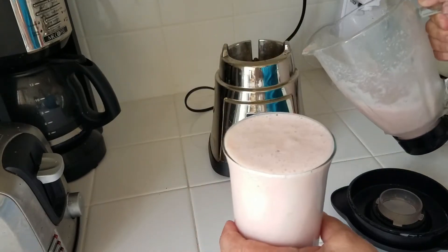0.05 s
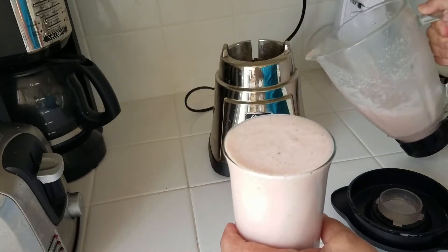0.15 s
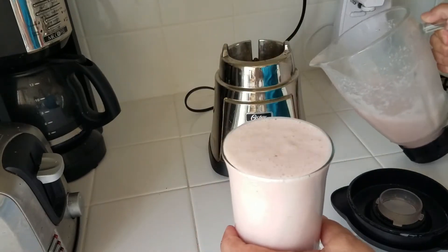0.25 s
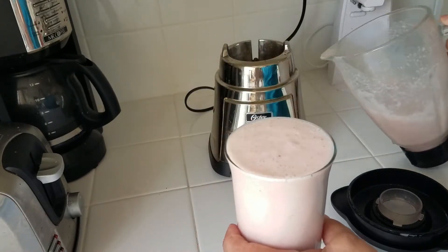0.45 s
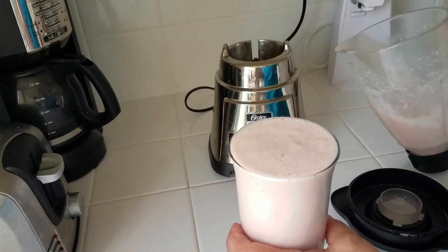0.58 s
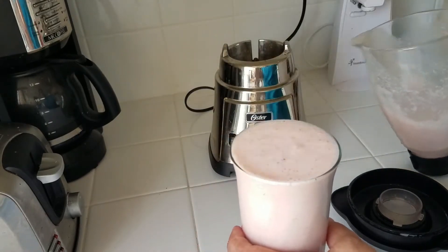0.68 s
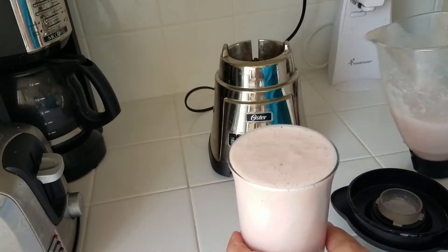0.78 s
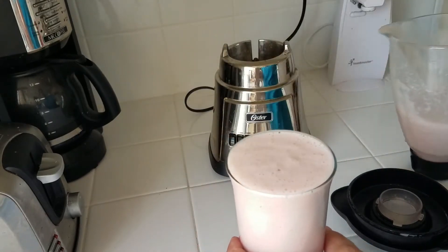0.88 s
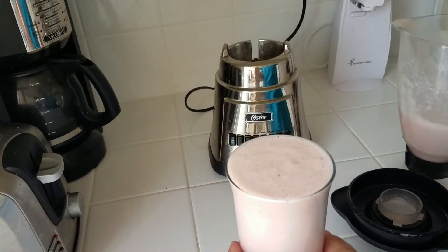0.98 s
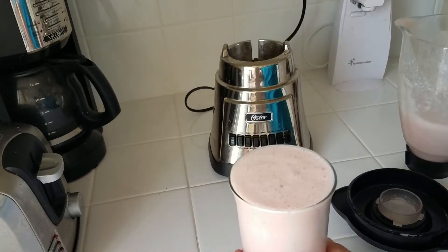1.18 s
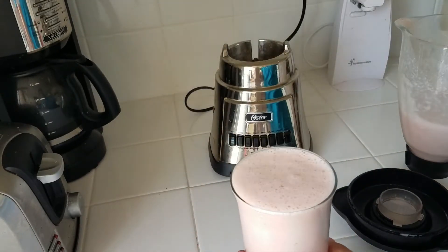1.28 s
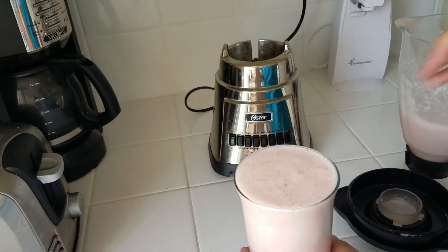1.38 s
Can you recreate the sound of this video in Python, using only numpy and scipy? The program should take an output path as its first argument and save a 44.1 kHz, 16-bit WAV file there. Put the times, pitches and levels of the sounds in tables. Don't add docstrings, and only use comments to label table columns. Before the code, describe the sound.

A heavy glass jar is set on a hollow tiled counter. After quiet room hum and faint hiss, it lands at 0.22 seconds with a deep thump, sharp clink, rattle and quick bounces until 0.29. A soft gritty scuff runs from 0.61 to 0.84. Its edge knocks at 0.97, it drops flat with a crack at 1.02, then rocks and settles by 1.1. Short kitchen reflections.

```python
import sys
import numpy as np
from scipy import signal
from scipy.io import wavfile
from scipy.ndimage import uniform_filter1d

SR = 44100
rng = np.random.default_rng(int(sys.argv[2]) if len(sys.argv) > 2 else 0)


def transcribe(signal):
    frames = np.atleast_2d(signal).T
    limited = np.clip(frames, -1, 1)
    pcm = np.round(limited * 32767).astype(np.int16)
    wavfile.write(sys.argv[1], SR, pcm)


def magnitude_from_level(level_db):
    exponent = np.asarray(level_db, float) / 20
    return 10 ** exponent


N = 63945


def at_hz(points, hz):
    table = np.array(points)
    return np.interp(np.log(hz), np.log(table[:, 0]), table[:, 1])


def rms_one(x):
    return x / np.sqrt(np.mean(x ** 2) + 1e-20)


def butter(x, order, hz, kind="low"):
    return signal.sosfilt(signal.butter(order, hz, kind, fs=SR, output="sos"), x)


def clicks(s, gain):
    out = np.zeros(N) + 1e-18
    out[np.clip((np.asarray(s) * SR).astype(int), 0, N - 1)] = gain
    return out


def ring(x, hz, t60):
    r = magnitude_from_level(-60 / (max(t60, 0.01) * SR))
    w = 2 * np.pi * hz / SR
    return signal.lfilter([0, np.sin(w)], [1, -2 * r * np.cos(w), r * r], x)


def burst_decay(s, db, t60):
    return signal.lfilter([1], [1, -magnitude_from_level(-60 / (t60 * SR))], clicks(s, magnitude_from_level(db)))


# frequency in Hz, likeness from 0 to 1.
LEFT_RIGHT_LIKENESS = [(100, 0.99), (300, 0.78), (600, 0.28), (2000, 0.01), (10000, 0.01)]


def coloured(spectrum, patchy_db):
    out = 0
    edges = 28 * 2 ** np.arange(0, 9.6, 0.5)
    white = rng.standard_normal((2, 2, N))
    for k, (low, high) in enumerate(zip(edges, edges[1:])):
        mid, side = butter(white[k % 2], 2, [low, high], "band")
        hz = np.sqrt(low * high)
        alike = np.clip(at_hz(LEFT_RIGHT_LIKENESS, hz), 0, 1)
        flicker = np.interp(np.arange(N), np.linspace(0, N, 20), rng.standard_normal(20))
        stereo = np.sqrt(1 + alike) * mid + np.sqrt(1 - alike) * side * [[1], [-1]]
        out = out + magnitude_from_level(at_hz(spectrum, hz) + patchy_db * flicker) * stereo
    return rms_one(out)


# frequency in Hz, level in dB per Hz.
HUM_COLOUR = [(30, -23), (50, 4.5), (110, 1.5), (400, -2), (700, -14.5), (3000, -25.5), (7500, -41),
              (13000, -35)]


def room_hum():
    return magnitude_from_level(-53.5) * coloured(HUM_COLOUR, patchy_db=1.5)


def thump(touches, modes, lead=-1):
    contact_hz, push_cut_hz, side_db = 336, 121.3, -18
    s, db = np.transpose(touches)[:2]
    r = np.exp(-2 * np.pi * contact_hz / SR)
    hits = clicks(s, magnitude_from_level(db) * np.where(s == s[0], lead, 1))
    push = signal.lfilter([(1 - r) ** 3], np.poly([r, r, r]), hits)
    push = butter(push, 2, push_cut_hz, "high")
    rings = np.array([magnitude_from_level(level_db) * ring(push, hz, t60) for hz, level_db, t60 in modes])
    slope = np.gradient(rings, axis=1) * SR / 1200
    side = magnitude_from_level(side_db) * rng.choice([-1, 1], len(modes)) @ slope
    return rings.sum(0) + side * [[1], [-1]]


def glass(touches, pitches, modes):
    port_turn = 0.33
    s, db = np.transpose(touches)[[0, 3]]
    out = np.zeros((2, N))
    for hz, (level_db, t60) in zip(pitches, modes):
        wave = ring(clicks(s, magnitude_from_level(db + level_db)), hz, t60)
        delay = SR * port_turn * rng.uniform(0.72, 0.77) / hz
        late = np.interp(np.arange(N) - delay, np.arange(N), wave)
        out += [wave, late] if rng.random() < 0.5 else [late, wave]
    return out


def crack(touches, colour):
    s, db = np.transpose(touches)[[0, 2]]
    return burst_decay(s, db, t60=0.07) * coloured(colour, patchy_db=1)


# start in seconds, thump in dB, crack in dB, glass in dB.
LANDING = [
    (.2195, -16.5, -39.5, -91),
    (.224, -6, -34.5, -81),
    (.2365, -13, -28.5, -39),
    (.2485, -14, -37, -52.5),
    (.265, -13, -37.5, -83),
    (.2825, -22.5, -53, -75),
    (.291, -27.5, -58, -80),
]
# frequency in Hz, level in dB, t60 in seconds.
LANDING_COUNTER = [(51.5, -4, 0.31), (109, -2, 0.14), (122, -2.5, 0.069), (169.4, 1.5, 0.071),
                   (199.9, -19.5, 0.55), (228, -3.5, 0.061), (277.6, -7, 0.3), (333, -16.5, 0.14),
                   (378.9, -15.5, 0.31), (466.6, -10, 0.14), (499.7, -35.5, 0.75)]
LANDING_GLASS_HZ = [1269, 1360, 1420, 1615, 2454, 3666, 3920, 3960, 4990, 5180, 6643, 7079, 8985, 9825]
# level in dB, t60 in seconds.
LANDING_GLASS = [(3, 0.21), (3, 0.11), (5, 0.05), (1, .2), (1.5, 0.38), (-3, 0.42), (-16, 0.32), (8, 0.14),
                 (-1.5, 0.17), (-1.5, 0.099), (-13, .15), (-11, 0.17), (-11.5, .11), (-9, 0.051)]
# frequency in Hz, level in dB per Hz.
LANDING_CRACK = [(250, -37), (500, 5.5), (1400, -1), (2200, -3.5), (5200, -20), (6200, -27), (9000, -29.5),
                 (16000, -50.5)]


def landing():
    thumps = thump(LANDING, LANDING_COUNTER)
    rings = glass(LANDING, LANDING_GLASS_HZ, LANDING_GLASS)
    return thumps, rings, crack(LANDING, LANDING_CRACK)


# start in seconds, level in dB.
TICK_TOUCHES = [
    (0.2215, -36.5),
    (0.2248, -51.5),
    (.2355, -64),
    (0.6185, -76),
    (0.666, -62.5),
    (1.0187, -42),
    (1.023, -65),
]


def ticks():
    s, db = np.transpose(TICK_TOUCHES)
    burst = burst_decay(s, db, t60=0.02) * rng.standard_normal((2, N))
    return butter(burst, 1, 2100, "high")


# frequency in Hz, width in Hz, level in dB.
SHELL_RESONANCES = [(1410, 410, 7.5), (2010, 190, 6.5), (3930, 230, -29), (4860, 350, -1), (6870, 680, -10.5),
                    (8550, 190, -10), (9500, 220, -27), (10000, 300, -29), (11700, 400, -15), (13300, 380, -18)]


def shiver():
    start_s, level_db, t60_s, rise_s = 0.2355, -24, 0.13, 0.0017
    t = np.arange(N) / SR - start_s
    fall = magnitude_from_level(level_db - 60 * np.maximum(t, 0) / t60_s)
    noise = rng.standard_normal((2, N)) * np.clip(t / rise_s, 0, 1) * fall
    return sum(magnitude_from_level(db) * butter(noise, 2, [hz - w / 2, hz + w / 2], "band") for hz, w, db in SHELL_RESONANCES)


def kitchen(x):
    t60_s, top_t60_s = 0.43, 0.24
    t = np.arange(SR // 2) / SR
    noise = rng.standard_normal((3, len(t)))
    low = butter(noise, 2, 450)
    top = butter(noise[:2], 1, 3000, "high")
    body = low[2] + noise[:2] - low[:2] - top
    tail = body * magnitude_from_level(-60 * t / t60_s) + top * magnitude_from_level(-60 * t / top_t60_s)
    tail = tail * np.clip(t / 0.005, 0, 1)
    tail = tail / np.sqrt(np.mean(np.sum(tail ** 2, 1)))
    return signal.fftconvolve(x, tail, axes=1)[:, :N]


# time in seconds, level in dB.
SCUFF_PRESSURE = [
    (0.607, -62.5),
    (0.616, -53.5),
    (0.662, -62),
    (0.669, -52),
    (.7, -51.5),
    (0.711, -47),
    (.73, -54),
    (0.773, -58),
    (.84, -69),
]
# frequency in Hz, level in dB per Hz.
SCUFF_NOISE = [(290, -33), (500, -9.5), (637, -10), (862, -7.5), (2350, -13), (4000, -33.5), (9000, -48),
               (11700, -70), (19800, -120)]


def scuff():
    s, db = np.transpose(SCUFF_PRESSURE)
    level = magnitude_from_level(np.interp(np.arange(N) / SR, s, db, left=-120, right=-120))
    grain = magnitude_from_level(1.8 * np.repeat(rng.standard_normal(N // 200 + 1), 200)[:N])
    level = uniform_filter1d(level, size=100)
    return level * uniform_filter1d(grain, size=100) * coloured(SCUFF_NOISE, patchy_db=0.3)


# start in seconds, thump in dB.
HAND_BUMP = [
    (.885, -45.5),
]
# start in seconds, thump in dB, crack in dB, glass in dB.
EDGE_TOUCH = [
    (.9705, -27, -56, -49),
    (.9732, -17, -56, -75),
]
DROP_FLAT = [
    (1.0179, -38, -29, -69),
    (1.0207, -15.5, -39, -62),
    (1.0364, -20.5, -72.5, -74),
]
ROCK_AND_SETTLE = [
    (1.054, -17, -65.5, -64),
    (1.098, -28.5, -66, -76),
]
# frequency in Hz, level in dB, t60 in seconds.
EDGE_COUNTER = [(118.3, 5.5, 0.26), (179, -11, 0.3), (269, -1.5, 0.094), (334, -2, 0.066), (532, -11, 0.45)]
DROP_COUNTER = [(118, 6.5, .11), (143, -10, 0.1), (177.5, -7.5, .2), (237.7, -1, 0.197), (275, 1, 0.084),
                (308.4, 0.5, 0.081), (375, -15, 0.31), (437, -42.5, 0.146), (466, -13, 0.12)]
SETTLE_COUNTER = [(208.3, -16, 0.38), (238.3, 1.5, 0.12), (316, -9.5, 0.26), (368, -4, 0.12),
                  (436, -6, 0.13)]
EDGE_GLASS_HZ = [3515, 4750, 4883, 7300, 8600]
DROP_GLASS_HZ = [2487, 2692, 2869, 4750]
# level in dB, t60 in seconds.
EDGE_GLASS = [(0, .16), (-5, .06), (-10, .08), (-18, .05), (-20, .05)]
DROP_GLASS = [(-13, 0.096), (-1, 0.22), (7.5, 0.14), (-17, .1)]
# frequency in Hz, level in dB per Hz.
DROP_CRACK = [(250, -24), (500, -0.5), (1400, -6), (2700, -25), (4500, -20.5), (7000, -27), (16000, -32.5)]


def tip_and_drop():
    thumps = thump(HAND_BUMP, EDGE_COUNTER[:1]) + thump(EDGE_TOUCH, EDGE_COUNTER)
    thumps = thumps + thump(DROP_FLAT, DROP_COUNTER) + thump(ROCK_AND_SETTLE, SETTLE_COUNTER, lead=0.79)
    rings = glass(EDGE_TOUCH, EDGE_GLASS_HZ, EDGE_GLASS)
    rings = rings + glass(DROP_FLAT + ROCK_AND_SETTLE, DROP_GLASS_HZ, DROP_GLASS)
    return thumps, rings, crack(EDGE_TOUCH + DROP_FLAT + ROCK_AND_SETTLE, DROP_CRACK)


def scene():
    land_thumps, land_rings, land_cracks = landing()
    drop_thumps, drop_rings, drop_cracks = tip_and_drop()
    thumps = land_thumps + drop_thumps
    rings = land_rings + drop_rings
    cracks = land_cracks + drop_cracks + ticks() + shiver()
    reflections = kitchen(magnitude_from_level(-15) * thumps + magnitude_from_level(-9) * cracks + magnitude_from_level(-10) * rings)
    balance = magnitude_from_level(np.array([[0.8], [-0.8]]))
    return thumps + (rings + cracks + scuff()) * balance + reflections + room_hum()


def low_pass(x):
    return signal.sosfilt(signal.butter(12, 16480, fs=SR, output="sos"), x)


def record(dry):
    mix = butter(dry, 2, 35, "high")
    return low_pass(mix)


dry = scene()
out = record(dry)
transcribe(out)
```